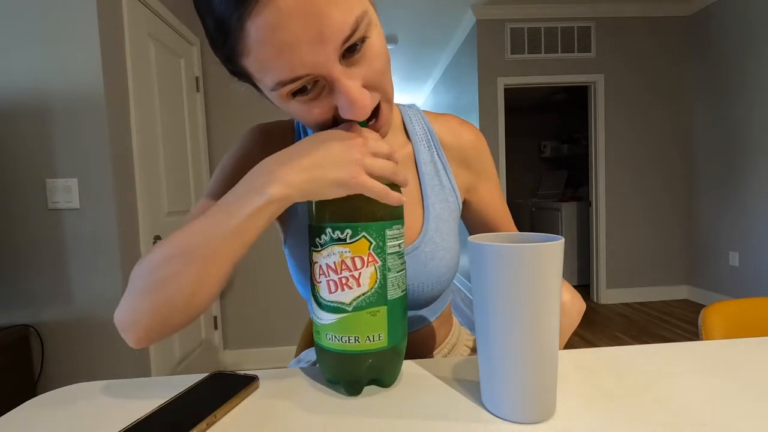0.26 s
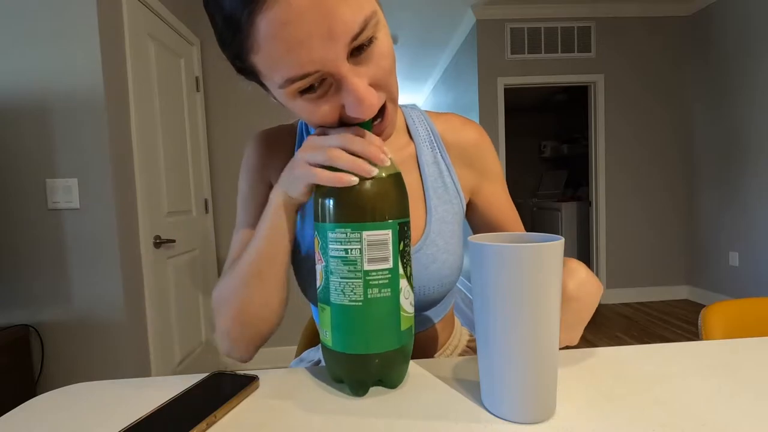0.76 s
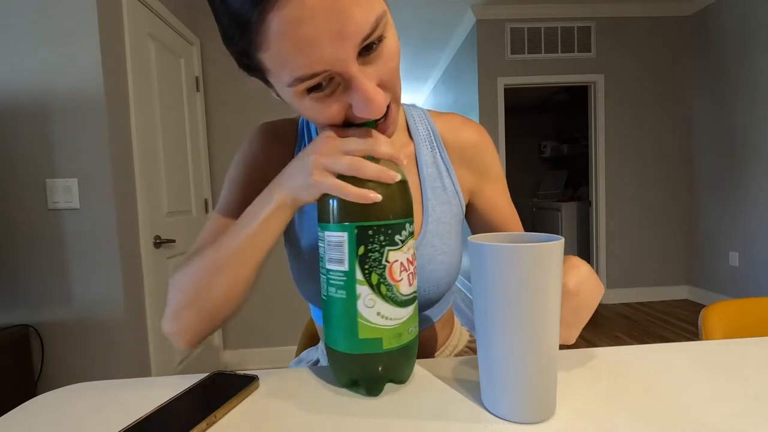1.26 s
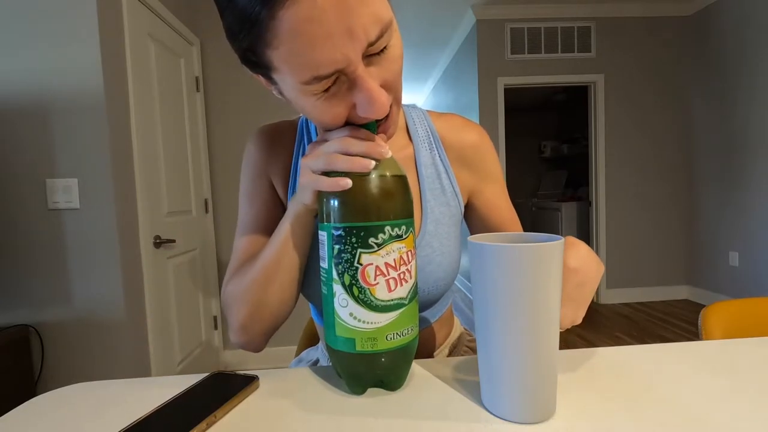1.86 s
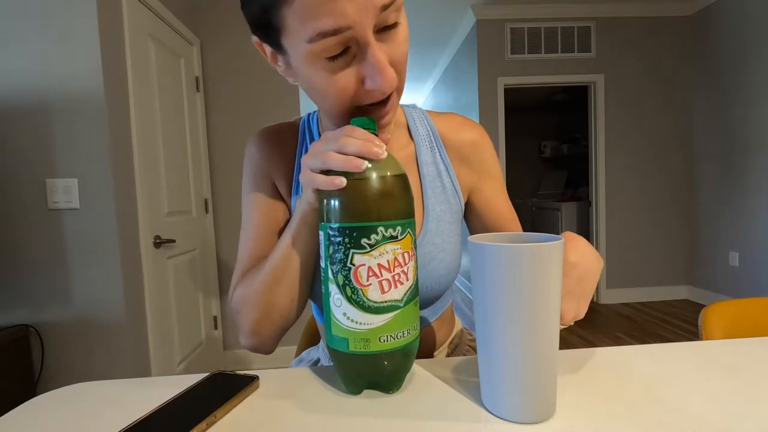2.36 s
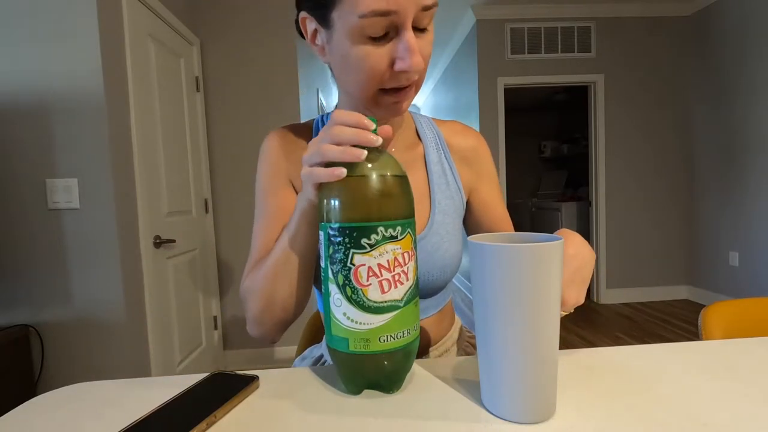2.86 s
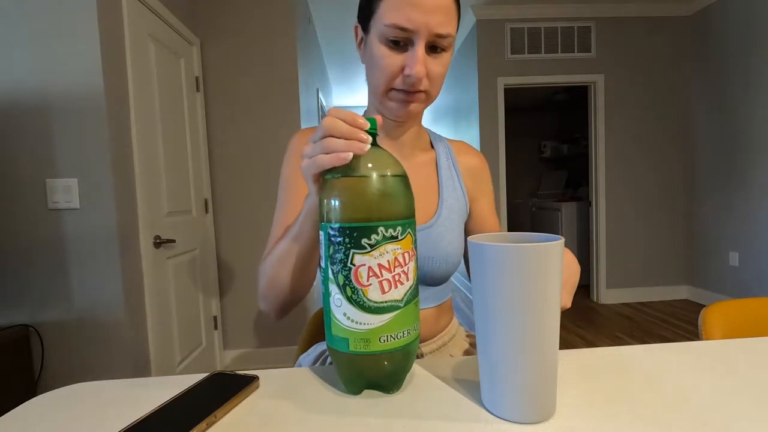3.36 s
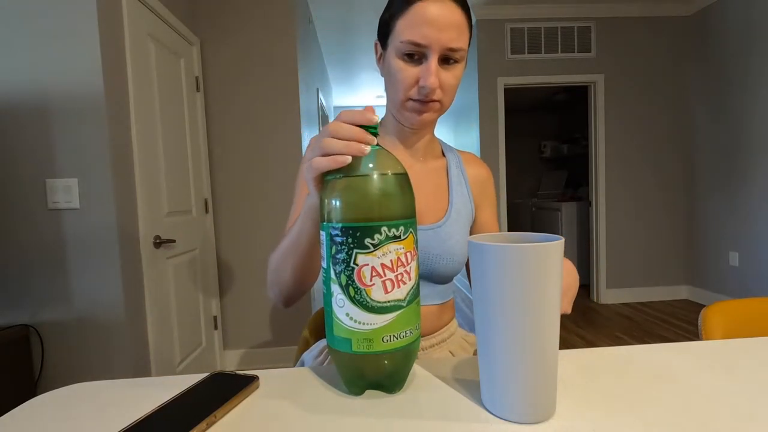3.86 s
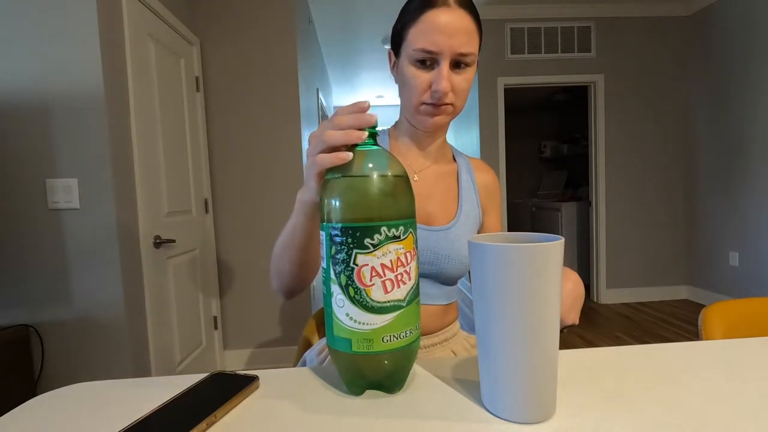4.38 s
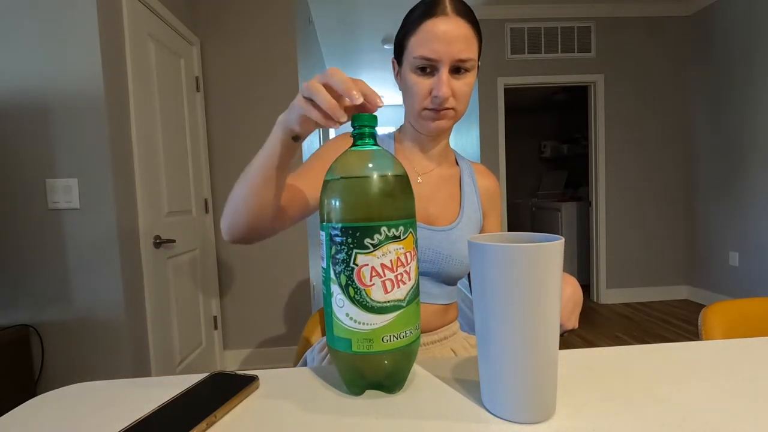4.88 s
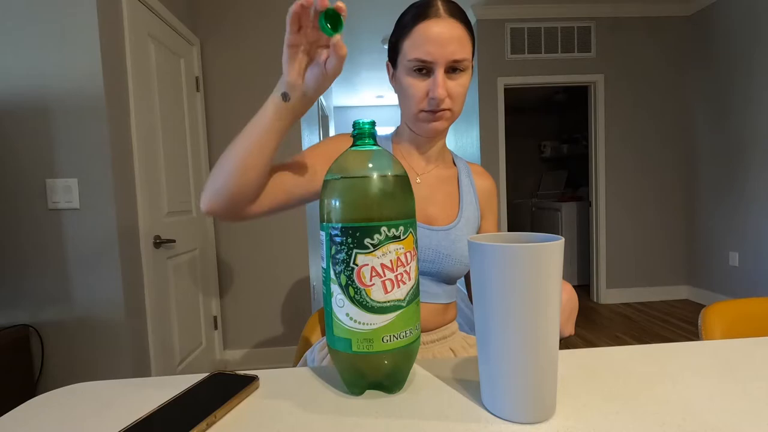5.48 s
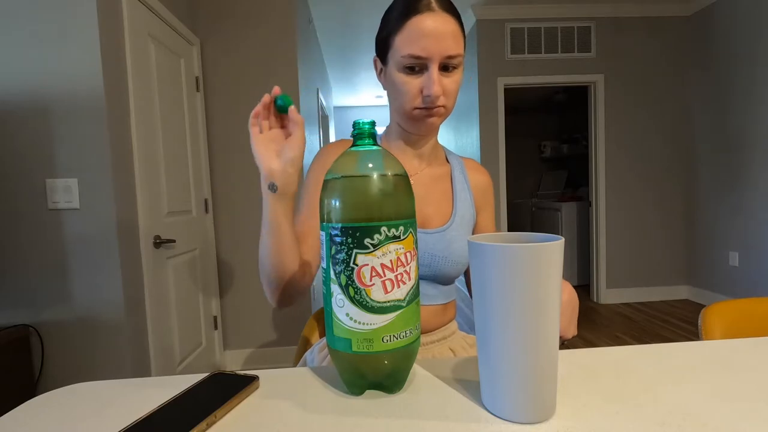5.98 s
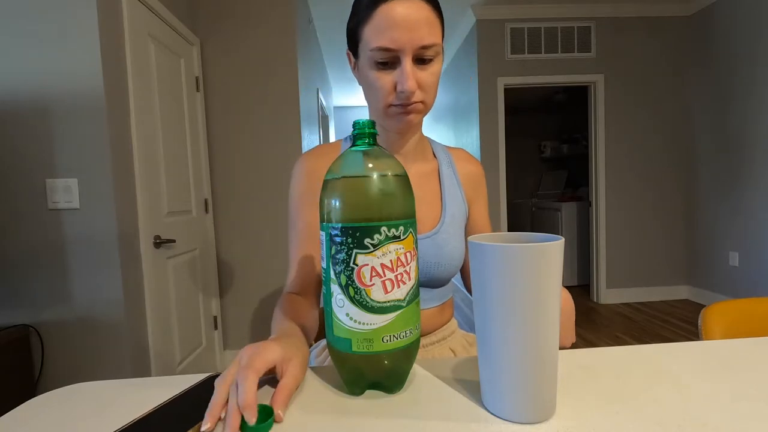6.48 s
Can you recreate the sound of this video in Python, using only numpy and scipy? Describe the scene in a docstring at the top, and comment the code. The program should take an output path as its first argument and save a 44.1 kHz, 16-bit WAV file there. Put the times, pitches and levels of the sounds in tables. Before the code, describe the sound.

A low duct rumble, faint airy hiss and wavering fan hum run throughout in a hard, lively kitchen, picked up close. Around 0.5-0.8 s there are light finger taps and a short gritty slide as a full plastic bottle turns on the counter. At 1.3 s the seal gives two dry snaps and pressurised gas bursts out: a loud, bright, spitting hiss with hollow neck tones, peaking near 1.4 s and fading unevenly. A weaker puff comes at 1.7 s, a barely audible one near 2.0, and a short spurt with a hollow pop and click at 2.2-2.3. Small taps follow near 2.8. From 3.46 to 4.1 s, tight cap clicks and juddering scrapes; from 4.4 to 5.1, looser knocks and rattles, sharpest around 4.7-4.8. A faint last scrape and click come at 5.3. After quiet hum, the cap is laid down around 6.4-6.6 s with a small tap and quick chatter.

```python
"""In a hard-walled kitchen with humming ventilation, a big plastic soda bottle is turned on the counter
and its tight cap worked loose. The seal cracks, and gas leaves the threads in a long spitting hiss, a weak
puff and a short spurt; then the cap clicks and scrapes off and is laid down.
Gas is shaped turbulent noise blowing resonances; contacts are damped modes and bursts; friction is dense
runs of tiny impulses; the room adds a decaying diffuse tail."""
import sys
import numpy as np
from scipy import signal
from scipy.fft import rfft, irfft
from scipy.io import wavfile
from scipy.ndimage import uniform_filter1d, map_coordinates

SR = 44100
rng = np.random.default_rng(int(sys.argv[2]) if len(sys.argv) > 2 else 0)


def waveform_to_disk(signal):
    """Save audio, clipped to [-1, 1], as 16-bit WAV at the path in sys.argv[1]."""
    frames = np.transpose(np.atleast_2d(signal))
    scaled = np.clip(frames, -1, 1) * 32767
    samples = np.round(scaled).astype(np.int16)
    wavfile.write(sys.argv[1], SR, samples)


N = 296793
T = np.arange(N) / SR  # time, s


def undb(db):
    """Level law: decibels to amplitude gain."""
    return 10 ** (np.asarray(db) / 20)


def unit(x):
    """Normalisation: scale to rms 1."""
    return x / np.sqrt(np.mean(x ** 2) + 1e-20)


def along(points, hz):
    """Logarithmic frequency axis: interpolate (f/Hz, value) points on it."""
    f, value = np.transpose(points)
    return np.interp(np.log(hz + 1e-6), np.log(f), value)


def colour(x, points, skirt_db=0):
    """Spectral shaping by (f/Hz, level/dB) points; beyond them the gain falls by skirt_db an octave."""
    hz = np.arange(len(x) // 2 + 1) * SR / len(x) + 1e-6
    octaves_outside = np.abs(np.log2(hz / np.clip(hz, points[0][0], points[-1][0])))
    gain = undb(along(points, hz) - skirt_db * octaves_outside)
    return irfft(rfft(x) * gain, len(x))


def resonate(x, hz, width):
    """Simple resonance: a two-pole filter with gain 1 at its centre."""
    b, a = signal.iirpeak(min(hz, SR / 2 - 1000), max(hz / width, 1), SR)
    return signal.lfilter(b, a, x)


def resonate_twice(x, hz, width):
    """Cascaded resonance: two equal filters in series give steeper skirts."""
    return resonate(resonate(x, hz, width), hz, width)


def walk(rate):
    """Slow random modulation: smoothed steps, rate of them per second, with rms 1."""
    k = int(SR / rate)
    steps = np.repeat(rng.standard_normal(N // k + 1), k)
    return unit(uniform_filter1d(steps, k)[:N])


def grains(rate, spread_db):
    """Shot noise: randomly timed impulses, rate per second, of uneven size and random sign, rms 1."""
    sizes = undb(spread_db * np.clip(rng.standard_normal(N), -2, 2)) * rng.choice([-1, 1], N)
    return unit(sizes * (rng.random(N) < rate / SR))


def envelope(start_s, attack_s, hold_s, db, fall_db_per_s):
    """Exponential decay: the gain opens smoothly, holds, then falls steadily in dB."""
    opening = np.sin(np.pi / 2 * np.clip((T - start_s) / max(attack_s, 1 / SR), 0, 1)) ** 2
    falling_s = np.maximum(T - start_s - attack_s - hold_s, 0)
    return opening * undb(db - fall_db_per_s * falling_s)


def add(track, s, sound):
    """Superposition: mix a sound in at time s."""
    i = int(s * SR)
    track[i:i + len(sound)] += sound[:N - i]


def stereo(mid, side):
    """Sum and difference: mid and side to left and right."""
    return np.array([mid + side, mid - side])


def bend(x, ratio):
    """Time-scale shift: a varying read speed moves all resonances of a noise by that ratio."""
    return map_coordinates(x, [np.cumsum(ratio)], order=3, mode="mirror")


def split_bands(spectrum, hz, centres, length):
    """Filter bank: overlapping triangular bands on a log-frequency axis, one at a time."""
    for centre in centres:
        yield irfft(spectrum * along(np.c_[centres, centres == centre], hz), length)


def churn(x, depth_db, rate):
    """Independent band modulation: each stretch of the spectrum swells and sinks on its own."""
    hz = np.arange(N // 2 + 1) * SR / N
    bands = split_bands(rfft(x), hz, np.geomspace(4400, 11000, 8), N)
    return sum(band * undb(depth_db * walk(rate)) for band in bands)


def ring(t, hz, t60):
    """Damped oscillation: one struck mode."""
    return np.sin(2 * np.pi * hz * t) * undb(-60 * t / t60)


def damped_noise(t, t60):
    """Damped broadband excitation: a noise burst losing 60 dB in t60."""
    return rng.standard_normal(len(t)) * undb(-60 * t / t60)


def strike(x, db):
    """Impact energy: scale so that the energy, spread over one millisecond, has level db."""
    return x * undb(db) / np.sqrt(np.sum(x ** 2) * 1000 / SR)


def tap(db, hz, width_hz=2500, t60=0.019):
    """Small impact: a damped burst filtered round its own frequency."""
    t = np.arange(SR // 40) / SR
    return strike(resonate_twice(damped_noise(t, t60), hz, width_hz), db)


# spectrum of duct rumble: f/Hz, spectral level/dB
DUCT_RUMBLE = [(20, 2), (33, -4), (55, -14), (90, -10.5), (102, -15.5), (130, -10.5), (187, -11.5),
               (198, -14.5), (214, -9), (260, -9), (300, -13.5), (365, -17), (400, -21.5), (470, -24),
               (750, -35.5)]
# spectrum of airy hiss: f/Hz, spectral level/dB
DUCT_AIR = [(600, 3), (780, -3), (1050, 4), (1500, -1.5), (2400, -4.5), (3700, -4.5), (4600, -8.5),
            (7500, -13.5), (8300, -24), (10700, -27), (12000, -38.5), (14500, -42)]
# fan and motor tones: mean f/Hz, mean rms level/dB
FAN_TONES = [(28.5, -43.5), (135.5, -42.5), (146, -45), (221, -44)]
# width of the ventilation's sound field: f/Hz, side filter level/dB
AIR_SIDE = [(60, -26), (170, -35.5), (370, -15.5), (690, -10), (2300, -5.5), (14000, -9)]


def ventilation(rumble_db=-31.5, air_db=-52, waver_db=3.0, drift_hz=1.206):
    """Flow noise and rotating machinery: duct rumble and smooth hiss with wavering fan tones."""
    def draught():
        """Broadband flow noise: the sum of low rumble and hiss."""
        rumble = unit(colour(rng.standard_normal(N), DUCT_RUMBLE, skirt_db=13))
        air = unit(colour(rng.standard_normal(N), DUCT_AIR, skirt_db=13))
        return rumble * undb(rumble_db) + air * undb(air_db)

    hum = np.zeros(N)
    for hz, db in FAN_TONES:
        phase = 2 * np.pi * np.cumsum(hz + drift_hz * walk(5)) / SR
        hum += np.sqrt(2) * undb(db + waver_db * walk(7)) * np.sin(phase)
    return stereo(draught() + hum, colour(draught(), AIR_SIDE))


# reverberation time: f/Hz, t60/s
REVERBERATION = [(1000, 0.64), (4000, 0.73), (12000, 0.57)]
# side filter of the reverb tail, nearly mono from 4.8 to 9 kHz: f/Hz, side relative to mid level/dB
TAIL_SIDE = [(1000, -8.5), (3300, -2.5), (4800, -26), (9000, -21), (13000, -2.5)]


def kitchen(x, wet_db):
    """Diffuse reverberation: direct sound, then dense reflections whose decay depends on frequency."""
    t = np.arange(SR) / SR
    centres = np.geomspace(500, 16000, 6)

    def tail():
        """Frequency-dependent decay: each band of noise dies at its own rate."""
        noise = rfft(rng.standard_normal(SR))
        bands = split_bands(noise, np.arange(SR // 2 + 1), centres, SR)
        decays = [undb(-60 * t / along(REVERBERATION, centre)) for centre in centres]
        onset = np.clip(t / 0.0006 - .5, 0, 1)
        return sum(band * decay for band, decay in zip(bands, decays)) * onset

    mid, side = tail(), colour(tail(), TAIL_SIDE)
    response = stereo(mid, side) * undb(wet_db) / np.sqrt(np.sum(mid ** 2))
    return x + signal.fftconvolve(x[None], response, axes=1)[:, :N]


# light taps of fingers and cap on plastic and counter: t/s, level/dB, centre f/Hz, filter width f/Hz
LIGHT_TAPS = [(.5405, -47, 4900, 1200), (0.547, -41, 4750, 1200), (.595, -39, 3300, 900),
              (.822, -43, 7150, 1600), (2.771, -51, 10000, 6000), (2.89, -41.5, 5300, 2000),
              (6.382, -51.5, 9000, 5000), (6.573, -39, 7600, 3000)]


def taps():
    """Light impact: fingers and cap touch plastic and counter in short damped bursts."""
    out = np.zeros(N)
    for s, db, hz, width_hz in LIGHT_TAPS:
        add(out, s, tap(db, hz, width_hz))
    return out


# spectrum of the bottle sliding on the counter: f/Hz, level/dB
SLIDE_SPECTRUM = [(1200, -14), (2200, 2), (2650, -9), (3300, 5.5), (4200, -8), (6500, 1), (8200, -6),
                  (10500, -7), (14500, -23)]


def slide(start_s=0.522, level_db=-43, attack_s=0.11, hold_s=0.02, fall_db_per_s=380):
    """Dry friction: fine grains swell, flutter and fade as the bottle is turned on the spot."""
    flutter = undb(2 * walk(110))
    friction = unit(colour(grains(3980, 3.2), SLIDE_SPECTRUM, skirt_db=15) * flutter)
    return friction * envelope(start_s, attack_s, hold_s, level_db, fall_db_per_s)


# skids as the cap is laid down: start t/s, hold t/s, level/dB
CAP_SKIDS = [(6.536, 0.022, -60), (6.602, 0.0072, -52)]


def set_down(land_s=6.5821, land_db=-35.5, land_hz=4100, bounce_s=0.0033, bounce_loss_db=4, count=4):
    """Repeated impact: the cap lands on its rim and chatters ever weaker; thin friction is its skid."""
    out = np.zeros(N)
    for k in range(count):
        add(out, land_s + k * bounce_s, tap(land_db - k * bounce_loss_db, land_hz))
    skid = unit(colour(grains(2000, 3.4), [(7000, 0), (13000, -15)], skirt_db=60))
    return out + skid * sum(envelope(s, 0.0026, hold_s, db, 1200) for s, hold_s, db in CAP_SKIDS)


# hollow pop during the last spurt: t/s, f/Hz, level/dB, t60/s
AIR_POP = [(2.2595, 1150, -21, 0.017), (2.2593, 1970, -22.5, 0.013)]


def pop():
    """Cavity resonance: the grip slips off the cap and a small pocket of air rings."""
    out, t = np.zeros(N), np.arange(SR // 20) / SR
    onset = 1 - np.exp(-t / 0.00052)
    for s, hz, db, t60 in AIR_POP:
        add(out, s, undb(db) * ring(t, hz, t60) * onset)
    return out


def tightness(s, start_s=3.64, length_s=0.44):
    """Loss of preload: how firmly the cap still grips at time s, from 1 tight to 0 loose."""
    return np.clip(1 - (s - start_s) / length_s, 0, 1)


# modes of the cap on the neck: mean f/Hz, relative level/dB, t60/s
CAP_MODES = [(2780, -1, 0.0096), (3273, 0.5, 0.011), (3654, 2, 0.011)]
# spectrum of cracking plastic: f/Hz, level/dB
PLASTIC_CRACK = [(3800, 13.5), (7400, 0), (8600, -9.5), (10500, -12), (14500, -30)]
# scrapes as the cap is turned: start t/s, hold t/s, level/dB, bottle wall f/Hz
THREAD_TURNS = [(3.465, 0.057, -55, 2000), (3.604, 0.056, -47, 1720), (3.818, 0.066, -42.5, 2040),
                (3.958, 0.034, -52, 1950), (4.519, .022, -49, 1700), (4.71, 0.063, -54, 1740),
                (4.783, 0.08, -51, 2080), (5.291, 0.016, -48, 1900)]


def threads(wall_width_hz=330, wall_db=-2, crackle_db=-14, tight_crackle_db=10,
            attack_s=0.0153, fall_db_per_s=1500, sag_share=0.041):
    """Stick-slip: juddering tiny slips ring cap and bottle, sag in pitch, and crackle less once loose."""
    slips = grains(1200, 2.6) * undb(3 * walk(130))
    # a mode's half-power width follows from its decay time
    cap = unit(sum(undb(db) * resonate(slips, hz, np.log(1000) / (np.pi * t60))
                   for hz, db, t60 in CAP_MODES))
    crackle_gain = undb(crackle_db + tight_crackle_db * tightness(T))
    crackle = unit(colour(slips, PLASTIC_CRACK, skirt_db=26)) * crackle_gain
    walls, effort, pitch = np.zeros(N), np.zeros(N), np.ones(N)
    for s, hold_s, db, wall_hz in THREAD_TURNS:
        turn = envelope(s, attack_s, hold_s, db, fall_db_per_s)
        progress = (T - s) / (hold_s + 2 * attack_s)
        pitch += sag_share * (1 - 2 * progress) * (np.abs(progress - .5) < .5)
        walls += unit(resonate(slips, wall_hz, wall_width_hz)) * turn
        effort += turn
    scrape = bend(cap * effort + undb(wall_db) * walls, pitch)
    scrape = colour(scrape, [(1100, 2), (1700, -.5), (2700, -4), (3800, -2.5)], skirt_db=14)
    return scrape + crackle * effort


# clicks of the cap in the threads:
# t/s, bottle knock level/dB, cap ring level/dB, crack level/dB before the grip offset, bottle wall f/Hz
THREAD_CLICKS = [(2.258, -26, -26, -23.5, 2000), (3.4611, -27, -25.5, -28, 2000),
                 (3.5737, -45, -30, -37, 1790), (3.631, -37, -36, -47, 1610),
                 (3.657, -27.5, -43, -38.5, 1700), (3.784, -36, -44, -53, 1490),
                 (3.869, -35, -42, -50, 1520), (3.8908, -34, -43, -48, 2010), (3.908, -37, -28, -41, 1850),
                 (4.003, -34, -35.5, -52, 1410), (4.019, -30, -36.5, -53, 1600),
                 (4.378, -33.5, -42, -52, 1480), (4.4273, -30.5, -36, -45, 1730),
                 (4.526, -28, -32.5, -36, 1870), (4.535, -39, -38, -40, 1500),
                 (4.6635, -25.5, -36, -26.5, 2090), (4.6874, -46, -41, -45, 1930),
                 (4.7156, -33, -34, -42, 1760), (4.726, -32.5, -41, -51, 1700),
                 (4.7598, -34.5, -43, -51, 2000), (4.7841, -31.5, -21.5, -28.5, 1900),
                 (4.7937, -36, -42, -39, 2150), (4.8205, -39, -45, -49, 2200), (4.886, -35, -52, -53, 1600),
                 (5.055, -39, -43, -43, 1390), (5.0636, -35, -32.5, -54, 1570),
                 (5.3125, -41, -42, -54, 1800)]


def cap_clicks(thud_width_hz=1300, body_hz=1230, body_db=-6.0, knock_t60=.012, crack_t60=.013,
               loose_crack_db=-2, tight_crack_db=8, loose_dullness=.7, contact_s=0.00049):
    """Modal impact: a slip knocks bottle wall and body, rings the cap and cracks, brighter when tight."""
    out, cracks, t = np.zeros(N), np.zeros(N), np.arange(SR // 30) / SR
    contact = 1 - np.exp(-t / contact_s)  # finite contact time softens the onset
    for s, knock_db, ring_db, crack_db, wall_hz in THREAD_CLICKS:
        grip = tightness(s)
        burst = damped_noise(t, crack_t60)
        wall = unit(ring(t, wall_hz, knock_t60)) + unit(resonate_twice(burst, wall_hz, thud_width_hz))
        body = undb(body_db) * unit(ring(t, body_hz, knock_t60))
        cap = np.zeros(len(t))
        for hz, mode_db, t60 in CAP_MODES:
            detuned_hz = hz * (1 + 0.017 * rng.standard_normal())
            cap += undb(mode_db) * rng.choice([-1, 1]) * ring(t, detuned_hz, t60)
        add(out, s, strike((wall + body) * contact, knock_db))
        add(out, s, strike(cap * contact, ring_db))
        # summing neighbouring samples dulls a loose crack; differencing brightens a tight one
        crack = signal.lfilter([1, loose_dullness * (1 - grip) - grip], 1, burst * contact)
        add(cracks, s, strike(crack, crack_db + loose_crack_db + grip * tight_crack_db))
    return out + colour(cracks, PLASTIC_CRACK, skirt_db=33)


# two snaps of the seal: t/s, ring f/Hz, ring level/dB, knock level/dB, crack level/dB before its spectrum
SEAL_SNAPS = [(1.2936, 1270, -26.5, -27.5, -25.5), (1.3075, 3200, -21.5, -41, -24)]
# spectrum of the breaking seal: f/Hz, level/dB
SEAL_SPECTRUM = [(4300, 10), (6200, 6.5), (7800, 2), (8700, -8), (14000, -19)]


def seal(ring_t60=0.018, knock_hz=1950, knock_width_hz=1100, snap_t60=.011):
    """Brittle fracture: each snap is a dry crack with a knock and one short ring of the plastic."""
    out, cracks, t = np.zeros(N), np.zeros(N), np.arange(SR // 30) / SR
    for s, hz, ring_db, knock_db, crack_db in SEAL_SNAPS:
        add(out, s, strike(ring(t, hz, ring_t60), ring_db))
        add(out, s, tap(knock_db, knock_hz, knock_width_hz, snap_t60))
        add(cracks, s, strike(damped_noise(t, snap_t60), crack_db))
    return out + colour(cracks, SEAL_SPECTRUM, skirt_db=45)


# surges of gas, each blowing one resonance of threads or neck:
# start t/s, hold at full level between the ramps t/s, level/dB, centre f/Hz
GAS_SURGES = [(1.314, 0.022, -33, 4640), (1.345, 0.077, -27, 5950), (1.374, 0.017, -20.5, 4750),
              (1.41, .012, -21, 4930), (1.473, 0.017, -27, 3240), (1.497, .024, -32, 2030),
              (1.547, .03, -40, 1250), (1.732, 0.02, -32, 4620), (2.216, 0.02, -42, 10450),
              (2.24, 0.022, -43, 4540)]


def surges(width_share=0.15, ramp_s=0.0087):
    """Flow-excited resonance: the gas sputters in short swells of narrow hiss that ride on the jet."""
    out = np.zeros(N)
    for s, hold_s, db, hz in GAS_SURGES:
        t = np.arange(int((hold_s + 2 * ramp_s) * SR)) / SR
        hiss = resonate_twice(rng.standard_normal(len(t)), hz, width_share * hz)
        swell = np.clip(np.minimum(t, t[-1] - t) / ramp_s, 0, 1)
        add(out, s, unit(hiss) * undb(db) * swell)
    return out


# gas escapes as the cap gives, then dies away as the pressure drops: start t/s, attack t/s, hold t/s,
# flow level/dB, fall/(dB per s), spray relative to flow level/dB, neck relative to flow level/dB
GAS_RELEASES = [(1.296, 0.097, 0.072, -15.5, 91, -7.5, -6), (1.44, 0.065, 0.076, -24, 130, -6.5, -4.5),
                (1.681, 0.034, 0.022, -27.5, 124, -15, -7.5), (1.965, 0.03, 0.045, -46.5, 400, -5, -10),
                (2.18, 0.054, 0.013, -32.5, 240, -6.5, -5.5)]
# spectrum of the jet: f/Hz, level/dB
JET_SPECTRUM = [(3950, -41), (4350, -3), (5000, -3.5), (5300, -8), (6000, -6.5), (6850, -10.5), (7300, -5),
                (7750, -8), (8050, -11), (8550, -11), (8900, -13.5)]
# spectrum of the fine spray: f/Hz, level/dB
SPRAY_SPECTRUM = [(8300, -2), (8700, -8), (9600, 2), (10700, 1), (11250, 2), (12100, -12), (12900, -3.5),
                  (14500, -31)]
# air resonances of neck and cupped hand: f/Hz, nominal width f/Hz (broadened below), relative level/dB
NECK_MODES = [(1247, 155, -1), (2000, 246, 1.5), (2200, 210, -1), (3080, 400, 0), (3490, 470, 0.5)]


def gas(jet_db=-2.0, spray_trim_db=-1.5, spit_share=0.55, flutter_db=0.5, rush_db=-21, gurgle_db=2.0,
        deep_hz=2400, full_flow_db=-22, choke=0.52, saturation_db=-20, wander=.014):
    """Turbulent jet noise: droplets spit, neck air resonates, foam makes them churn and wander."""
    flows = np.array([envelope(*row[:5]) for row in GAS_RELEASES])
    spray_db, neck_db = np.transpose(GAS_RELEASES)[5:, :, None]
    flow = np.linalg.norm(flows, axis=0)
    # spray and neck level off at high flow
    saturation = 1 / np.hypot(1, flow / undb(saturation_db))
    spray = np.linalg.norm(flows * undb(spray_db), axis=0) * saturation
    hollow = np.linalg.norm(flows * undb(neck_db), axis=0) * saturation

    turbulence = unit(rng.standard_normal(N) + spit_share * grains(500, 2.8))
    turbulence = churn(turbulence * undb(flutter_db * walk(260)), depth_db=1.4, rate=55)
    jet = bend(colour(turbulence, JET_SPECTRUM, skirt_db=27), 1 + wander * walk(30))
    out = unit(jet) * flow * undb(jet_db)
    out += unit(colour(turbulence, SPRAY_SPECTRUM, skirt_db=60)) * spray * undb(spray_trim_db)

    modes = []
    for hz, width, db in NECK_MODES:
        mode = resonate(resonate(rng.standard_normal(N), hz, 1.55 * width), hz, 1.75 * width)
        modes.append(undb(db + gurgle_db * walk(45.4)) * mode)
    # deep resonances need a strong flow
    weak = np.minimum(flow / undb(full_flow_db), 1) ** choke
    blown = sum(mode * (weak if row[0] < deep_hz else 1) for mode, row in zip(modes, NECK_MODES))
    blown = bend(blown / np.std(sum(modes)), 1 + wander * walk(30))
    rush = unit(resonate(rng.standard_normal(N), 880, 310)) * undb(rush_db)  # soft rush of the free plume
    return out + (blown + rush) * hollow


def scene():
    """Superposition: gas and handling noises reverberate in the room, over the ventilation."""
    escape = gas() + surges()
    cap = seal() + cap_clicks() + threads()
    touches = pop() + taps() + slide() + set_down()
    handling = kitchen(cap, wet_db=-6.5) + kitchen(touches, wet_db=-7.5)
    return kitchen(escape, wet_db=-4) + handling + ventilation()


def record(dry, threshold_db=-26, squeeze=0.35, release_s=0.94, top_hz=14500):
    """Automatic gain control: level backs off under loud sound, recovers slowly; a low-pass cuts the top."""
    power = uniform_filter1d(np.mean(dry ** 2, axis=0), SR // 20)
    loudness = np.sqrt(np.abs(power))
    fade = np.exp(-T / release_s)
    held = np.maximum.accumulate(loudness / fade) * fade  # peak hold with exponential release
    gain = np.maximum(held / undb(threshold_db), 1) ** -squeeze
    low_pass = signal.ellip(10, .2, 80, top_hz, fs=SR, output="sos")
    return signal.sosfilt(low_pass, dry * gain)


dry = scene()
out = record(dry)
waveform_to_disk(out)
```